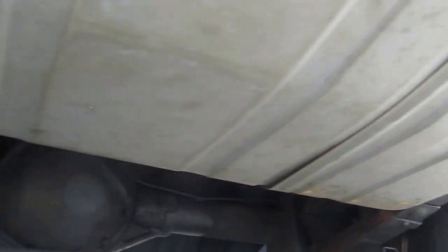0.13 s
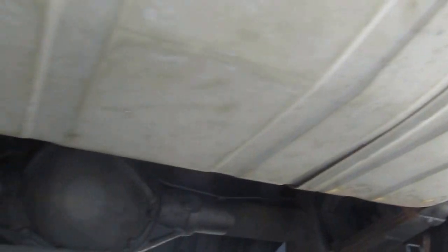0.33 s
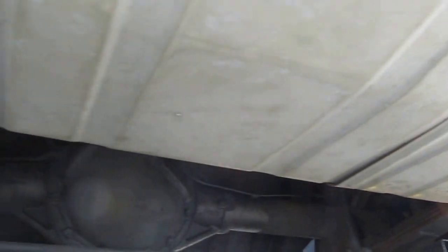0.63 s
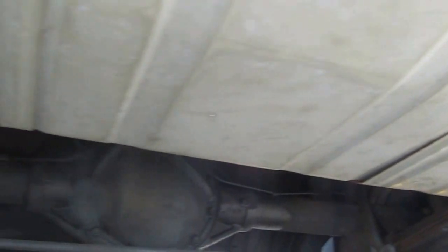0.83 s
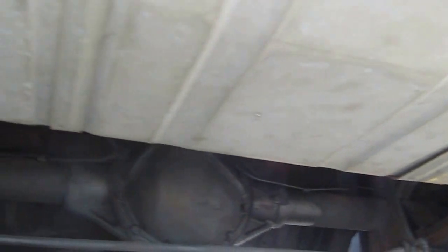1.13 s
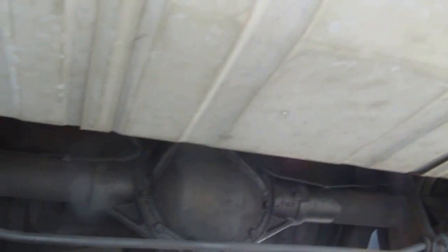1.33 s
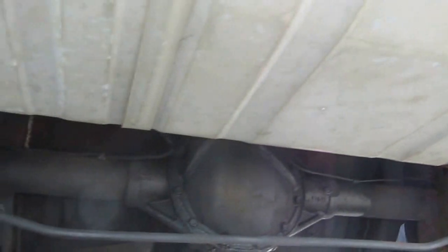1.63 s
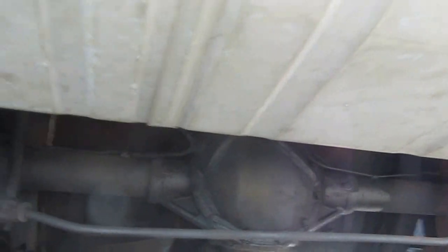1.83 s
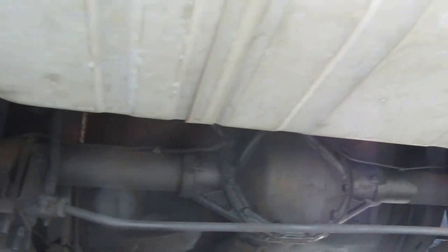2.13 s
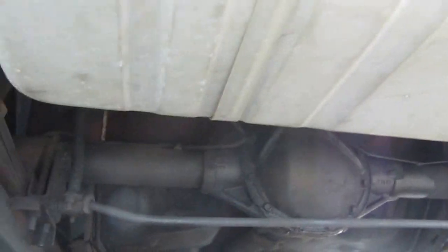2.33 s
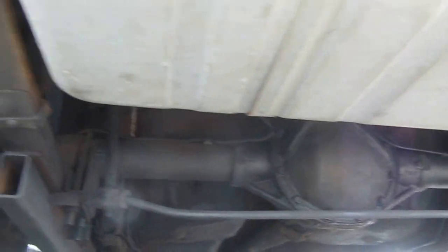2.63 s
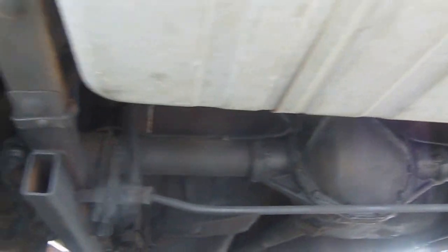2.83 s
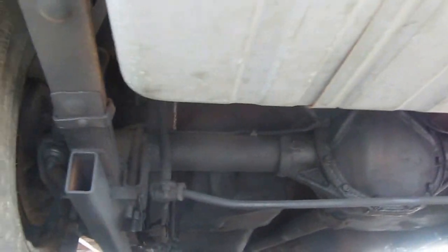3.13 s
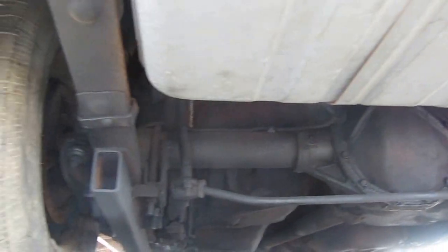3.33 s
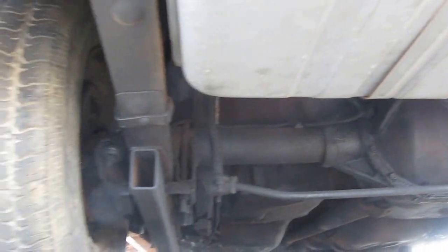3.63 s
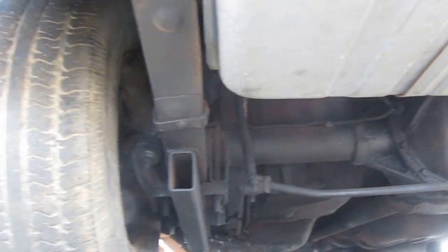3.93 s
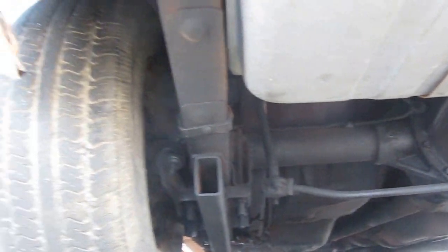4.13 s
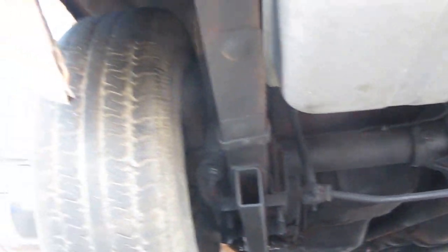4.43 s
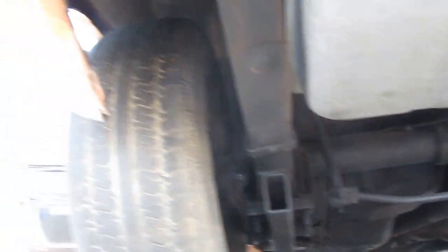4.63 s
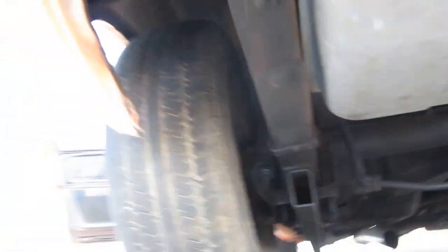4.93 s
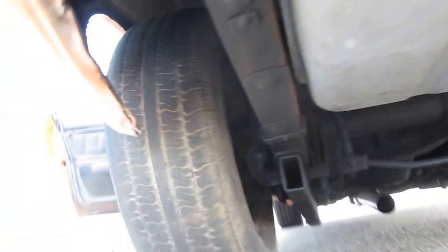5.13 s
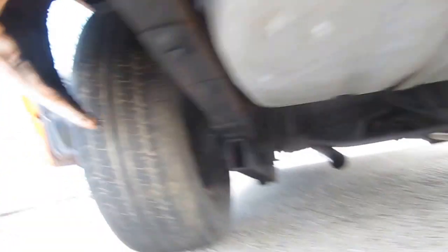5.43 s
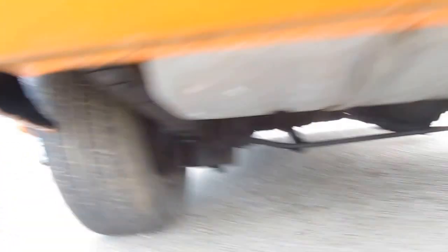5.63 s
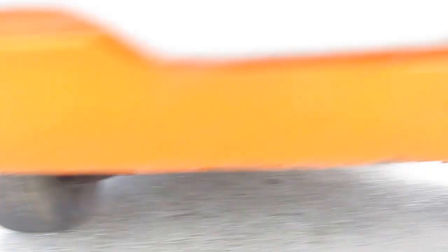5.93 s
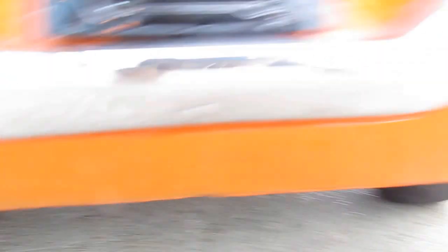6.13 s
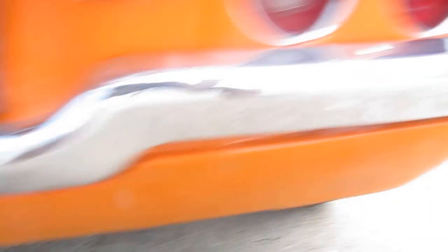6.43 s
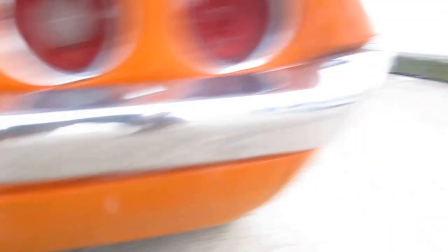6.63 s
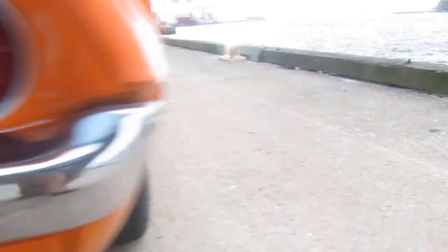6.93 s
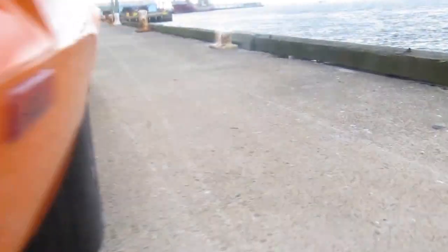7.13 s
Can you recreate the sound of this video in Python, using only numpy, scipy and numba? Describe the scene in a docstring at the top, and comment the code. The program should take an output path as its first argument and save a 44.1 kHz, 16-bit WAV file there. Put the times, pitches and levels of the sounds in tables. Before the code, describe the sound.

From 0 s a big V8 petrol engine is already idling, around 640 revolutions a minute, about 43 firings a second, through open pipes. The low boom is loud, lumpy and slightly irregular, with brief stumbles near 0.3, 0.8 and 2 s. Very close under the tail, it overloads the microphone, turning pulses into buzzy, clipped thuds that chop the hiss. Bright ticks, alternately stronger, and a rush of fan and gas run throughout; sharper clinks stand out, strongest near 3.3 and 4.3 s. From 5.4 s the microphone pulls away; crossing the pipe's gas stream around 5.8 s, hiss swells and rough pops spit until about 6.4 s, with fainter ones after. The idle then sounds clearer, with a low flutter from under the body. A dull double bump lands at 6.73 s. Beside the car, ticks soften and the rumble continues to 7.3 s, outdoors, without fading.

```python
"""A big V8 idles loudly through open pipes, booming over bright ticks and the rush of fan and gas.
Eight uneven firings a cycle ring the pipes, most strongly at 82 and 100 Hz; shaped noise makes ticks, rush and hiss.
The microphone creeps along under the tail, then backs out beside the car amid popping exhaust.
The boom overloads it, flattening each wave and chopping the hiss, less so as it moves away."""
import sys
import numpy as np
from scipy import signal
from scipy.fft import rfft, irfft, next_fast_len
from scipy.io import wavfile
from scipy.ndimage import uniform_filter1d
from numba import njit

SR = 44100
rng = np.random.default_rng(int(sys.argv[2]) if len(sys.argv) > 2 else 0)


def unload_wav(signal):
    """Save mono or channel-first audio to the path in sys.argv[1] as 16-bit WAV at rate SR, clipped to [-1, 1]."""
    wavfile.write(
        sys.argv[1],
        SR,
        np.round(np.clip(np.atleast_2d(signal).T, -1, 1) * 32767).astype(np.int16),
    )


N = 321048
LEAD = SR // 2  # samples of engine running before 0 s
TIME = np.arange(-LEAD, N) / SR
FIRING_JITTER = 0.018  # spread, firing intervals


def undb(db):
    """Decibels to gain."""
    return 10 ** (np.asarray(db) / 20)


def unit(x):
    """Scale to rms 1."""
    return x / np.sqrt(np.mean(x ** 2))


def curves(table):
    """Join each column of a table by straight lines in time."""
    s, *columns = np.transpose(table)
    return [np.interp(TIME, s, column) for column in columns]


def bump(s, half_length_s):
    """Smooth swell from 0 to 1 and back around time s."""
    return np.exp(-((TIME - s) / half_length_s) ** 2)


def step(s, half_length_s):
    """Smooth rise from 0 to 1 around time s."""
    return 0.5 + 0.5 * np.tanh((TIME - s) / half_length_s)


def filtered(x, response):
    """Pass x through a response given as a function of frequency."""
    size = next_fast_len(len(x) + LEAD)
    hz = np.maximum(np.arange(size // 2 + 1) * SR / size, 1e-3)  # keeps log(hz) finite
    return irfft(rfft(x, size) * response(hz), size)[:len(x)]


def ring(x, modes):
    """Resonances in parallel, each opposite in polarity to the last."""
    def response(f):
        total = 0
        for k, (hz, width_hz, db) in enumerate(modes):
            total = total + (-1) ** k * undb(db) / (1 + 1j * (f * f - hz * hz) / (f * width_hz))
        return total
    return filtered(x, response)


def noise(spectrum):
    """Noise of rms 1, coloured by (Hz, dB) points and falling away below the first."""
    hz, db = np.transpose(spectrum)

    def colour(f):
        low_cut = f / np.hypot(f, hz[0])
        return undb(np.interp(np.log(f), np.log(hz), db)) * low_cut
    return unit(filtered(rng.standard_normal(len(TIME)), colour))


def walk(rate_hz):
    """Smooth random wander of rms 1, low-passed at rate_hz."""
    return unit(filtered(rng.standard_normal(len(TIME)), lambda f: 1 / (1 + (f / rate_hz) ** 4)))


def strokes(crank, phase, db, jitter, scatter_db):
    """One impulse per cylinder and cycle, each a little off in time and size; crank counts firings."""
    turn = np.arange(int(crank[0]) + 1, int(crank[-1]) + 1)
    cylinder = turn % len(db)
    late, uneven = rng.standard_normal((len(turn), 2)).T
    at = np.searchsorted(crank, turn + phase[cylinder] + jitter * late)
    gain = undb(db[cylinder] + scatter_db * uneven)
    return np.bincount(at, gain, len(crank) + 1)[:-1]


# weak firings, each a brief dip around its centre
# columns: centre_s [s], level_db [dB], half_length_s [s]
STUMBLES = [(0.348, -3, 0.035), (0.752, -5.5, 0.014), (2.01, -6, 0.033), (6.12, -7, 0.015)]


def stumbles():
    """Brief dips in firing strength, in dB."""
    return sum(db * bump(s, half_length_s) for s, db, half_length_s in STUMBLES)


# idle speed before the drag of stumbles
# columns: time_s [s], speed_rpm [rev/min]
SPEED = [(0.0, 642.2), (0.9, 657.1), (1.1, 633.0), (1.62, 655.6), (1.72, 644.5), (1.8, 649.3), (2.9, 630.7),
         (3.04, 644.8), (3.46, 630.8), (4.18, 650.7), (4.76, 614.4), (5.36, 639.4), (5.46, 622.8),
         (5.9, 664.4), (6.74, 621.0), (7.28, 657.0)]


def crankshaft(stumble_db, drag_rpm_per_db=14, flywheel_s=0.2):
    """Firings counted from 0 s; weak ones slow the crank through the flywheel, then it recovers."""
    rpm, = curves(SPEED)
    drag_db = filtered(stumble_db, lambda f: 1 / (1 + 2j * np.pi * f * flywheel_s))
    rpm = rpm + drag_rpm_per_db * drag_db
    crank = np.cumsum(rpm / 60 * 4) / SR  # four firings a revolution
    return crank - crank[LEAD]


# cylinders in firing order
# columns: lateness [firing intervals], pulse_db [dB], tick_db [dB]
CYLINDERS = [(-0.0014, 1.5, 14), (-0.063, 2, 13.5), (0.0373, 0.63, 19.5), (-0.0508, 2.5, 9),
             (-0.036, 1.27, 16), (-0.0384, 3, -14), (-0.12, -3.5, 17.5), (0.01, 2.5, 11.5)]


def firings(crank, phase=0.858, scatter_db=1.0):
    """Unequal, unevenly spaced pulses of gas, one per cylinder; phase in firing intervals."""
    late, pulse_db, _ = np.transpose(CYLINDERS)
    return strokes(crank, phase + late, pulse_db, FIRING_JITTER, scatter_db)


# quick swells and dips of exhaust strength
# columns: time_s [s], level_db [dB]
EFFORT = [(0, 0), (.22, 2), (.29, 0), (.5, 1.3), (.7, 1.5), (.9, 1.5), (1.03, -1.5), (1.14, 1.5), (1.45, 0),
          (1.8, 1), (2.07, 0), (2.15, -0.5), (2.35, 0.5), (2.58, 0.8), (2.72, -0.8), (2.92, 0.5), (3.2, 0),
          (3.31, -1.5), (3.6, 1), (4.04, -0.7), (4.2, 0.5), (4.43, -1), (4.59, 1), (4.72, -0.5), (4.97, 0),
          (5.07, 0), (5.17, -0.5), (5.56, 0), (5.66, 1), (5.84, -0.5), (6.5, -0.26), (7.28, 0.5)]


def effort(crank, lope_db=0.76, lope_peak_firing=2.39):
    """Exhaust strength in dB: quick swells and dips plus a lope that swells once a cycle."""
    cycle = (crank - lope_peak_firing) / len(CYLINDERS)
    return curves(EFFORT)[0] + lope_db * np.cos(2 * np.pi * cycle)


# exhaust resonances, alternating in polarity
# columns: pitch_hz [Hz], width_hz [Hz], level_db [dB]
PIPE = [(44.59, 8.8, -11.5), (81.76, 14.34, 1), (100.14, 17.1, 1.5), (145.7, 53, -21.5), (170, 12.4, -24)]
# turbulence in the pipes
# columns: pitch_hz [Hz], level_db [dB]
RUMBLE = [(22, -6), (45, -46), (70, -3.5), (110, -7), (150, -3.5), (200, -9.5), (260, -19.5), (400, -26),
          (1000, -64)]
EXHAUST_DB, EXHAUST_LOSS_DB = 3, 7.2  # at 1 m re overload point; loss per doubling of distance


def exhaust(pulses, effort_db, soft_hz=215, rumble_db=-21, choke=0.41, choke_s=0.0086):
    """Gas pulses ring the pipes, whose mouths lose more the harder they are driven."""
    # valves take milliseconds to open: round pulses
    rounded = filtered(pulses, lambda f: 1 / (1 + (f / soft_hz) ** 8))
    boom = unit(ring(rounded, PIPE))
    power = uniform_filter1d(boom ** 2, int(choke_s * SR))
    boom = unit(boom / (1 + 2 * power) ** (choke / 2))  # evens out the surges
    return boom * undb(effort_db) + undb(rumble_db) * noise(RUMBLE)


# fan, belts and gas
# columns: pitch_hz [Hz], level_db [dB]
RUSH = [(150, 22.5), (300, 25), (500, 22.5), (800, 13), (1150, 11.5), (1500, 5.5), (2100, 5), (2700, 4.5),
        (3100, 6), (4000, 2.5), (5500, -1.5), (10000, -3.5), (12500, -44), (16000, -31)]
RUSH_DB, RUSH_LOSS_DB = -28, 9.5  # at 1 m; per doubling


def rush(crank, depth=0.18, swell_phase=0.41):
    """Fan and gas noise, swelling a little with each firing."""
    return noise(RUSH) * (1 + depth * np.cos(2 * np.pi * (crank - swell_phase)))


# bright ticks and spitting gas, shared by ticks and hiss
# columns: pitch_hz [Hz], level_db [dB]
BRIGHT = [(500, 26), (2000, 2.5), (3500, 4.5), (5500, 2.5), (8000, 6.5), (9700, 10.5), (10350, 12),
          (10800, 8), (11500, 7.5), (13000, -3), (16000, -23)]
TICKS_DB, TICKS_LOSS_DB = -40.5, 9  # at 1 m before the swell below; per doubling
CLEAREST_S, CLEAREST_LENGTH_S, CLEAREST_DB = 4.33, 4.3, 7  # ticks come through more clearly here


def ticks(crank, phase=0.499, scatter_db=1.5, rise_s=0.00097, decay_s=0.0041):
    """Bright noise ticks, one per cylinder, every second one louder, perhaps leaking exhaust."""
    tick_db = np.transpose(CYLINDERS)[2]
    # phase in firing intervals
    taps = strokes(crank, np.full(len(tick_db), phase), tick_db, FIRING_JITTER, scatter_db)
    envelope = filtered(taps, lambda f: 1 / (1 + 2j * np.pi * f * rise_s) / (1 + 2j * np.pi * f * decay_s))
    return unit(envelope * noise(BRIGHT))


HISS_DB, HISS_LOSS_DB = -42, 4.5  # at 1 m off the beam; per doubling
CROSSES_S, CROSSING_S, BEAM_DB = 5.78, 0.26, 9.5  # microphone crosses the tailpipe beam


def hiss(crank, depth=0.21, swell_phase=0.58, sputter_db=4.5, sputter_hz=89):
    """Bright sputtering gas, swelling once a firing."""
    swell = 1 + depth * np.cos(2 * np.pi * (crank - swell_phase))
    sputter = unit(undb(sputter_db * walk(sputter_hz)))
    return noise(BRIGHT) * swell * sputter


# sharpest metallic ticks; level before the envelope
# columns: start_s [s], level_db [dB], pitch_hz [Hz]
CLINKS = [(0.333, -31, 10200), (1.269, -28, 9400), (1.638, -26, 10000), (3.33, -16, 9600),
          (3.898, -24, 9900), (4.271, -20.5, 10300), (4.456, -25, 10200), (4.649, -28, 10100),
          (5.035, -25, 10600), (5.084, -29, 11300), (5.226, -36, 10100), (5.319, -24, 9700),
          (5.652, -25, 9600), (5.699, -27.5, 10400)]


def clinks(rise_s=0.00021, decay_s=0.0045, width_hz=1100):
    """Single hard ticks, each a short noise burst ringing at its own pitch."""
    out, age = np.zeros(len(TIME)), np.arange(SR // 20) / SR
    envelope = (1 - np.exp(-age / rise_s)) * np.exp(-age / decay_s)
    for s, db, hz in CLINKS:
        at = np.searchsorted(TIME, s)
        tone = unit(ring(rng.standard_normal(len(age)), [(hz, width_hz, 0)]))
        out[at:at + len(age)] += undb(db) * envelope * tone
    return out


# hard firings popping out of the pipe
# columns: centre_s [s], level_db [dB], half_length_s [s]
POPS = [(5.703, 2, 0.0068), (5.784, 4.5, 0.014), (5.891, 7.5, .008), (5.971, 3.5, 0.0063),
        (5.994, 3, 0.0066), (6.066, 6.5, 0.01), (6.153, 3.5, 0.0046), (6.208, 4.5, 0.0065),
        (6.282, 4, 0.0055), (6.298, 2.5, 0.0061), (6.363, 5.5, .005), (6.425, 1, .005), (6.443, 2.5, 0.011),
        (6.638, 1, 0.0038), (6.68, 1.5, 0.0058), (6.973, 2.5, 0.0043)]


def pops():
    """Brief surges in firing strength, in dB."""
    return sum(db * bump(s, half_length_s) for s, db, half_length_s in POPS)


# rough low burst as a hard firing overloads the microphone
# columns: pitch_hz [Hz], level_db [dB]
RASP = [(300, 4), (520, -6), (780, -17), (1150, -19), (1600, -23), (3000, -28), (8000, -57)]


def rasp(pop_db, level_db=-24):
    """Dull rasp, opened by the excess gain of each pop."""
    return undb(level_db) * (undb(pop_db) - 1) * noise(RASP)


# hollow under the body
# columns: pitch_hz [Hz], width_hz [Hz], level_db [dB]
FLANK = [(137, 21, 4.5), (169.5, 32, -2.5), (205, 28, -2)]
FLANK_DB = -21
CLEAR_S, CLEAR_LENGTH_S = 6.15, 0.5  # microphone clears the bumper


def flank(pulses, soft_hz=238, uneven_db=3, uneven_hz=58):
    """Low flutter: firings of randomly varied strength ring the hollow under the body."""
    uneven = pulses * undb(uneven_db * walk(uneven_hz))
    return unit(filtered(ring(uneven, FLANK), lambda f: 1 / (1 + (f / soft_hz) ** 12)))


# dull double bump; louder level sets the peak
# columns: start_s [s], level_db [dB]
KNOCKS = [(6.727, -16.5), (6.744, -16)]
# its resonances
# columns: pitch_hz [Hz], width_hz [Hz], level_db [dB]
KNOCK_MODES = [(348, 70, 12), (540, 290, 4.5), (760, 130, 2.5), (1030, 220, 0)]


def knock(soft_hz=950):
    """Two softened impulses ring broad resonances, perhaps a hand on the microphone."""
    s, db = np.transpose(KNOCKS)
    impulses = np.bincount(np.searchsorted(TIME, s), undb(db), len(TIME))
    push = filtered(impulses, lambda f: 1 / (1 + (f / soft_hz) ** 6))
    thud = ring(push, KNOCK_MODES)
    return undb(db.max()) * thud / np.abs(thud).max()


# engine bay resonances
# columns: pitch_hz [Hz], width_hz [Hz], level_db [dB]
BAY = [(1120, 88, 11), (3050, 160, -7), (3370, 70, -4), (3540, 70, 1), (4140, 100, -8), (5240, 50, -7),
       (5857, 40, -2), (6578, 44, 5)]


def bay(level_db=-52.5):
    """Faint singing of the engine bay: noise through narrow resonances."""
    return undb(level_db) * unit(ring(rng.standard_normal(len(TIME)), BAY))


# microphone path: along under the tail, then out
# columns: time_s [s], distance_m [m from the pipes]
DISTANCE = [(0, 0.99), (3.4, 0.97), (5.35, 1.213), (5.85, 2.12), (7.28, 2.46)]
# rounding the corner, the body shades the treble
CORNER_S, CORNER_LENGTH_S, TICKS_SHADE_DB, HISS_SHADE_DB = 6.98, 0.22, -10, -2


def scene():
    """The crank times the engine; the microphone's place sets how strongly its parts arrive."""
    stumble_db, pop_db = stumbles(), pops()
    crank = crankshaft(stumble_db)
    pulses = firings(crank)
    effort_db = effort(crank) + stumble_db + pop_db
    doublings = np.log2(curves(DISTANCE)[0])
    beside = step(CORNER_S, CORNER_LENGTH_S)

    exhaust_db = EXHAUST_DB - EXHAUST_LOSS_DB * doublings
    rush_db = RUSH_DB - RUSH_LOSS_DB * doublings
    ticks_db = TICKS_DB - TICKS_LOSS_DB * doublings
    ticks_db = ticks_db + CLEAREST_DB * bump(CLEAREST_S, CLEAREST_LENGTH_S) + TICKS_SHADE_DB * beside
    hiss_db = HISS_DB - HISS_LOSS_DB * doublings
    hiss_db = hiss_db + BEAM_DB * bump(CROSSES_S, CROSSING_S) + HISS_SHADE_DB * beside

    air = (undb(exhaust_db) * exhaust(pulses, effort_db)
           + undb(rush_db) * rush(crank)
           + undb(ticks_db) * ticks(crank)
           + undb(hiss_db) * hiss(crank)
           + clinks()
           + rasp(pop_db)
           + undb(FLANK_DB) * step(CLEAR_S, CLEAR_LENGTH_S) * flank(pulses)
           + knock()
           + beside * bay())
    return air[None, LEAD:]


@njit
def peak_follower(x, start, attack, release):
    """Envelope that jumps up with the peaks and sinks slowly."""
    out, e = np.empty(len(x)), start
    for i in range(len(x)):
        e += (x[i] - e) * (attack if x[i] > e else release)
        out[i] = e
    return out


# the amplifier's own dull hiss
# columns: pitch_hz [Hz], level_db [dB]
MIC_HISS = [(1000, 5), (1800, 2.5), (3000, 1.5), (6000, -12), (10000, -13.5), (16000, -28)]


def record(dry, knee=18, bias=0.07, mic_hiss_db=-55, low_cut_hz=205,
           attack_s=0.0001, release_s=2.13, ceiling_db=-9.0, top_hz=16000):
    """Microphone saturates, low cut turns flat tops into decaying spikes, gain control holds the peaks."""
    pressure = dry[0] + bias  # overloads sooner on one side
    # while pinned, almost nothing else gets through
    pinned = pressure / (1 + np.abs(pressure) ** knee) ** (1 / knee)
    pinned = pinned + undb(mic_hiss_db) * noise(MIC_HISS)[LEAD:]
    low_cut = signal.butter(1, low_cut_hz, "high", fs=SR)
    thin = signal.lfilter(*low_cut, pinned - pinned[0])
    size = np.abs(thin)
    attack, release = 1 - np.exp(-1 / (attack_s * SR)), 1 / (release_s * SR)
    peaks = peak_follower(size, size[:LEAD].max(), attack, release)
    held = thin * undb(ceiling_db) / peaks
    top_cut = signal.ellip(8, 0.2, 70, top_hz, fs=SR, output="sos")
    return signal.sosfilt(top_cut, held)[None]


dry = scene()
out = record(dry)
unload_wav(out)
```